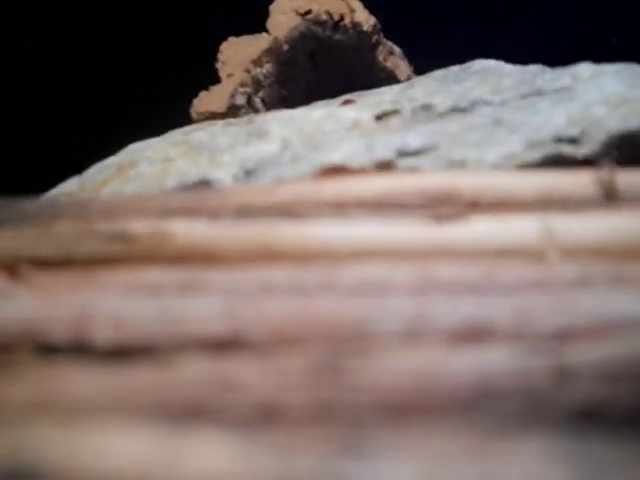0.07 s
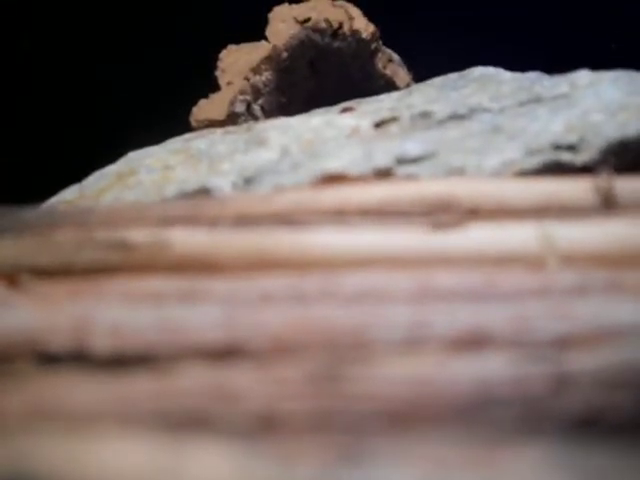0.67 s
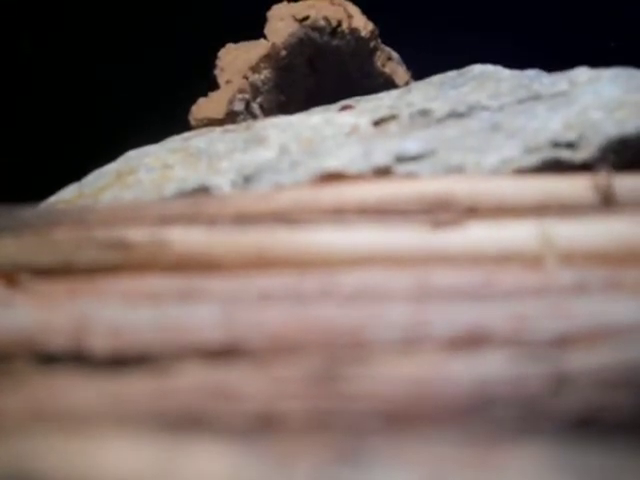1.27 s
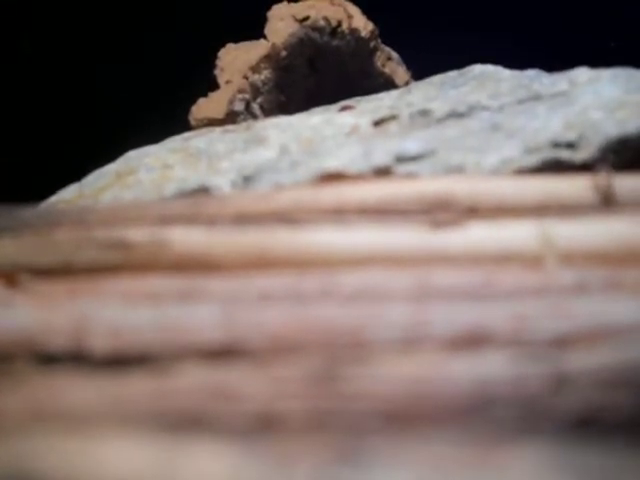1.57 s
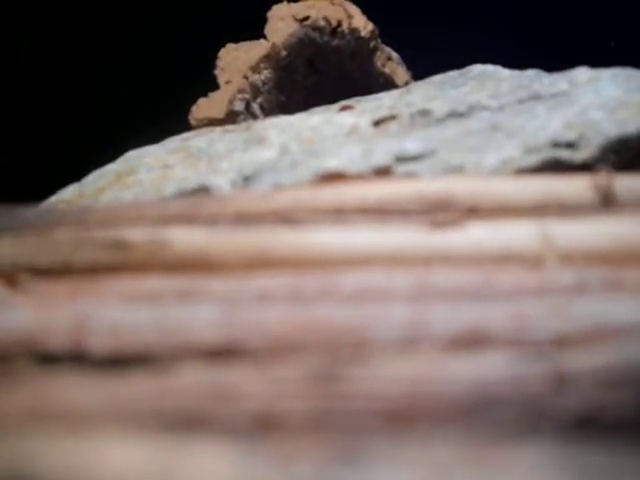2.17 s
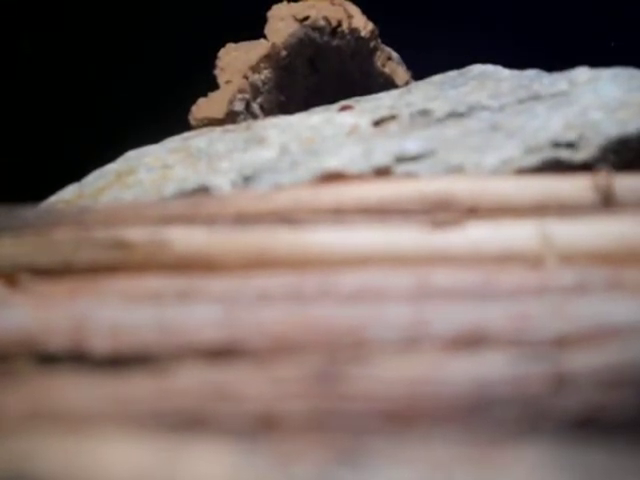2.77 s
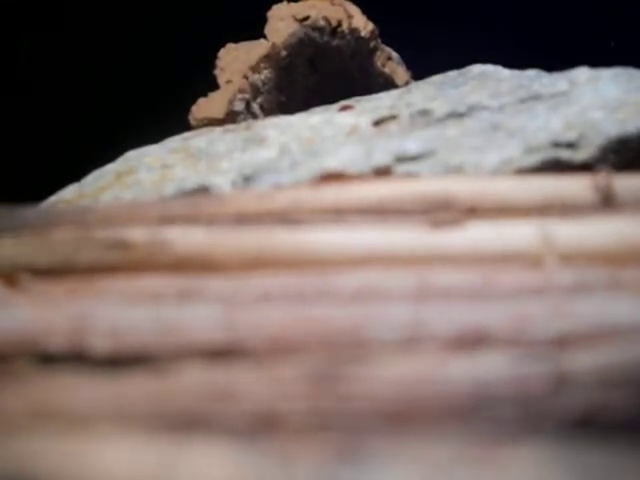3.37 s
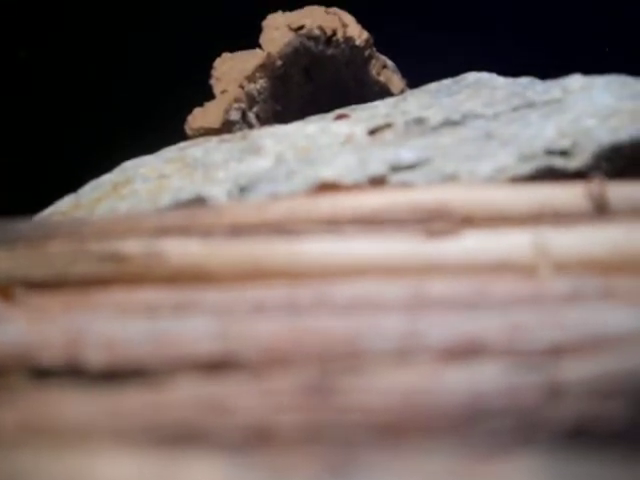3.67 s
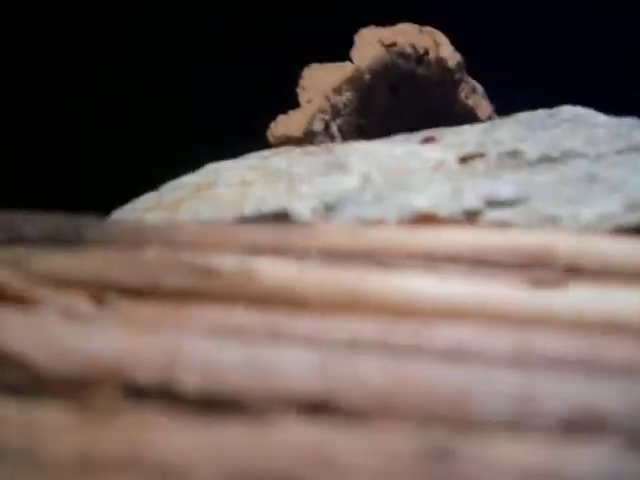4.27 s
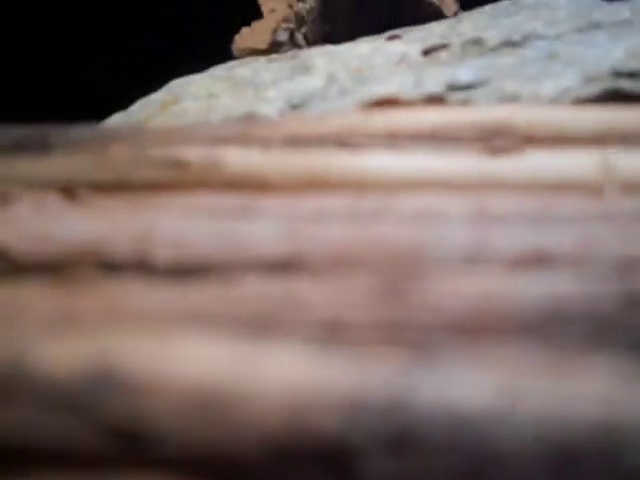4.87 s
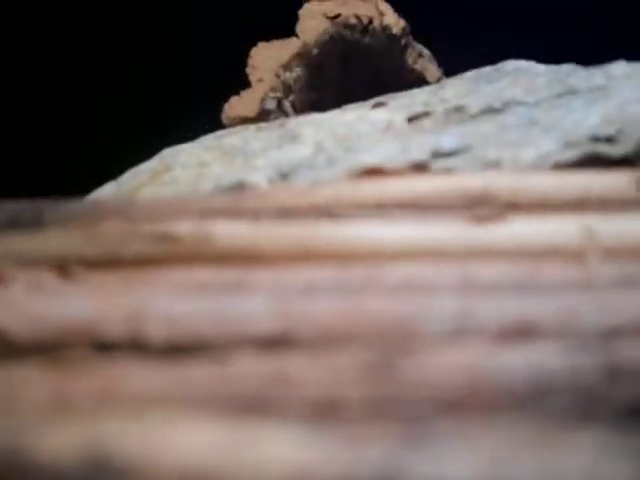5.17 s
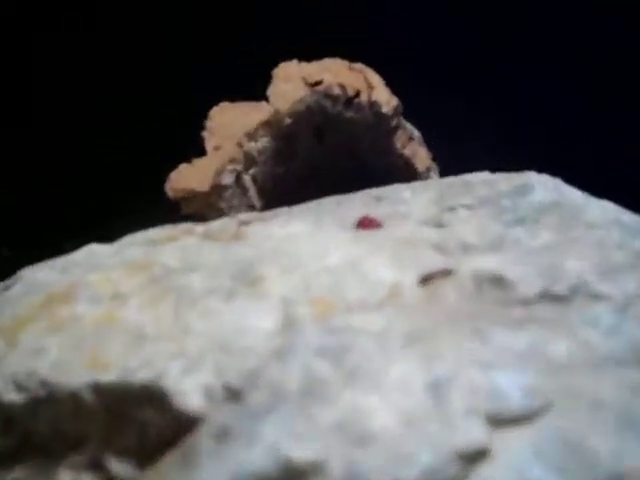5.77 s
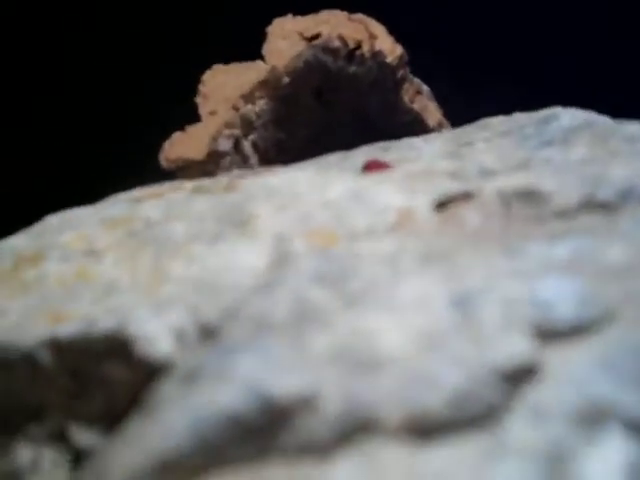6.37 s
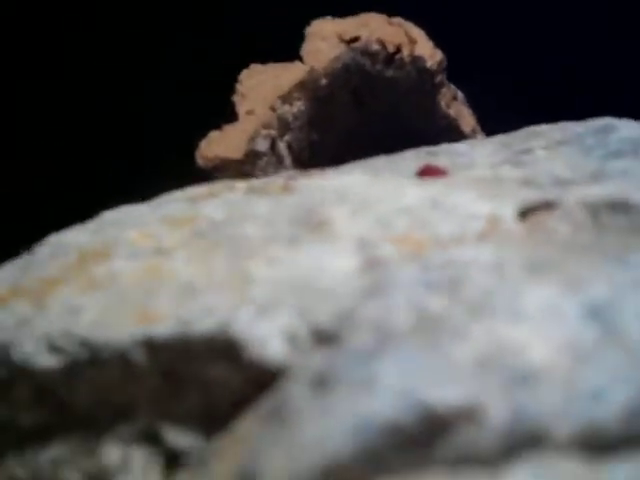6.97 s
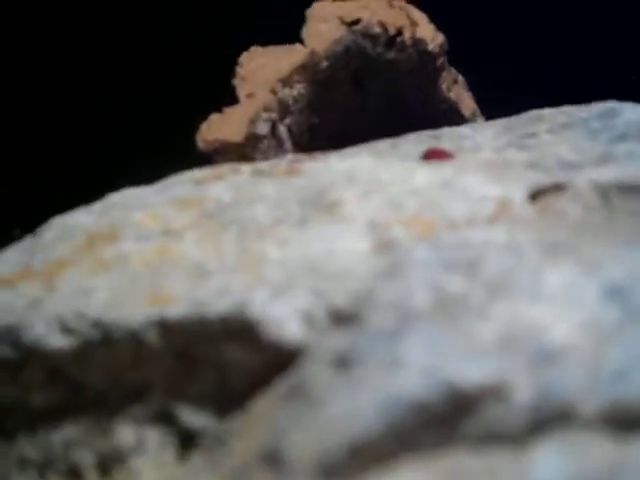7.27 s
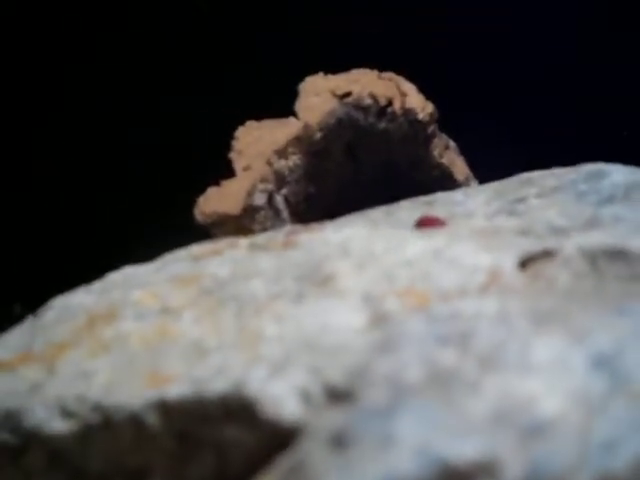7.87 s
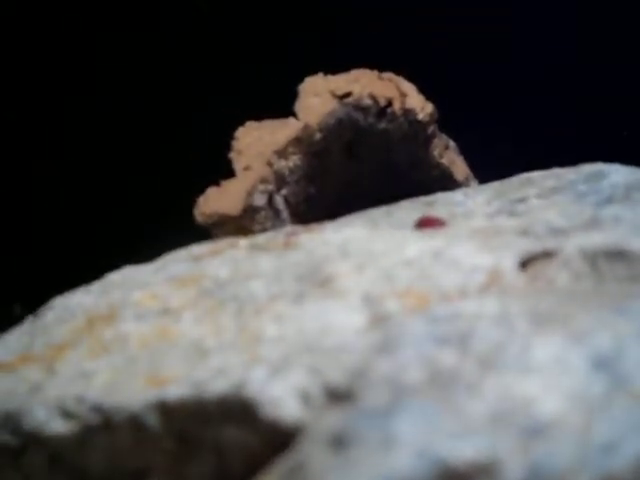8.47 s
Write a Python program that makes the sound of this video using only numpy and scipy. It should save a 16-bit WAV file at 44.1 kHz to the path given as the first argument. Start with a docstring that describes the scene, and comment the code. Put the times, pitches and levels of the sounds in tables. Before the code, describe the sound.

Handling noise comes straight through the case of a small camera indoors: scattered soft ticks, then a loud cluster of finger rubs, clicks and dull thuds. Lighter bumps lead to a second sharp knock with a rustle, and a plastic seam creaks briefly near the end. Behind it, an even hiss and faint fan hum dip after the heavier handling and slowly return. The sound is close, with little treble.

```python
"""Handling a small camera

A camera is held and shifted in a quiet room with a steady hiss and the hum of a fan. Fingers rub and
knock the case, which rings and carries it straight to the microphone; a seam creaks as the grip eases.
The room sinks after heavy handling and creeps back. The narrow recorder overloads on the hardest knocks."""
import sys
import numpy as np
from scipy import signal
from scipy.fft import rfft, irfft, next_fast_len
from scipy.io import wavfile
from scipy.ndimage import uniform_filter1d

SR = 44100
rng = np.random.default_rng(int(sys.argv[2]) if len(sys.argv) > 2 else 0)


def pcm_store(signal):
    """Save signal as 16-bit PCM."""
    levels = np.round(np.clip(np.atleast_2d(signal), -1, 1) * 32767)
    wavfile.write(sys.argv[1], SR, levels.astype(np.int16).T)


N = 380583
TIME = np.arange(N) / SR

# The three holds of the hand on the camera. Each entry: start in seconds.
HOLD_STARTS = [0, 6.5, 7.25]
# Tone of skin dragging on the case. Each row: frequency in Hz, relative level in dB.
FRICTION_SPECTRUM = [(20, -0.5), (60, 8), (130, -2.5), (300, 3.5), (600, 2), (1100, -2), (1800, -4.5),
                     (2500, -3.5), (3500, -9.5), (4400, -1), (5500, -56)]
# Tone of a dull blow through the whole body. Each row: frequency in Hz, relative level in dB.
THUD_SPECTRUM = [(20, -13), (70, 1), (150, -1.5), (300, -8.5), (600, -13), (1200, -22.5), (4000, -40)]


def amp(db):
    """Decibels to gain."""
    return 10 ** (np.asarray(db) / 20)


def unit(x):
    """Scales to an rms of 1."""
    return x / np.sqrt(np.mean(x ** 2) + 1e-20)


def add(mix, start, sound):
    """Mixes a sound in at a start time in seconds."""
    part = mix[round(start * SR):][:len(sound)]
    part += sound[:len(part)]


def colour(x, spectrum):
    """Equalises with a curve of (Hz, dB) points joined on a log axis."""
    hz, db = np.transpose(spectrum)
    size = next_fast_len(len(x))
    bins = np.fft.rfftfreq(size, 1 / SR)
    gain = amp(np.interp(np.log(bins + 1), np.log(hz), db))
    return irfft(rfft(x, size) * gain, size)[:len(x)]


def resonate(x, hz, width_hz):
    """Rings one resonance."""
    return signal.lfilter(*signal.iirpeak(hz, hz / width_hz, fs=SR), x)


def drift(rate):
    """A random wander of rms 1 that turns about rate times a second."""
    knots = np.arange(0, TIME[-1] + 1, 1 / rate)
    return unit(np.interp(TIME, knots, rng.standard_normal(len(knots))))


def hold_at(seconds):
    """Index of the hold in use at that moment."""
    return np.searchsorted(HOLD_STARTS, seconds, side="right") - 1


def room_tone(hiss_db=-41, waver=.003, flutter=.25):
    """A bed of even hiss under the slightly wavering tones of a fan."""
    # Colour of the hiss. Each row: frequency in Hz, relative level in dB.
    hiss_spectrum = [(15, -32), (25, -4), (42, -2), (90, -7.5), (140, -5), (175, -10), (215, -8.5),
                     (290, -15), (430, -14), (850, -16.5), (1250, -18), (3600, -22.5), (4500, -24),
                     (5500, -60.5)]
    # Hum of the fan. Each row: frequency in Hz, level in dB.
    fan_tones = [(37.7, -60.5), (145.3, -47), (209.9, -59), (479.1, -56), (1082, -60.5)]
    bed = amp(hiss_db) * unit(colour(rng.standard_normal(N), hiss_spectrum))
    for hz, db in fan_tones:
        level = amp(db) * (1 + flutter * drift(6.6))
        pitch = hz * (1 + waver * drift(6))
        bed += level * unit(np.sin(2 * np.pi * np.cumsum(pitch) / SR))
    return bed


def through_case(force, direct_db, hold):
    """The case passes a force on, partly direct and partly ringing in the modes this hold excites."""
    # Each row: frequency in Hz, width in Hz, then gain in dB in the first, second and third hold.
    modes = [(149, 40, 5, 5.5, -4), (294, 92, -2, 0, -32), (554, 130, -11.5, -2, -28),
             (820, 210, -6.5, -9, 4), (937, 66, -5.5, -0.5, -8), (1150, 440, 0.5, 4, -4),
             (1375.4, 150, -6.5, -3, -1), (1750, 190, -9.5, -14.5, 5.5), (2290, 560, -1, -0.5, -3),
             (2680, 440, -7, -7.5, 6.5), (2900, 240, -15, -4, 8.5), (3070, 410, -6, -10.5, -15),
             (3350, 340, -18.5, 6.5, -3), (3720, 120, -13.5, -12.5, 1)]
    rings = sum(amp(db[hold]) * resonate(force, hz, width) for hz, width, *db in modes)
    return amp(direct_db) * force + rings


def stroke_envelopes(rise_share=.56, shape=1.42, bass_lag_s=.0024):
    """Treble and bass gains: each finger stroke swells and fades, and the heavy body shakes on a little."""
    # Each row: time of the peak in seconds, length in seconds, level in dB, bass boost in dB.
    strokes = [ (0.255, 0.014, -32.5, -7), (0.342, 0.017, -37, 11.5), (1.097, 0.036, -42.5, 5),
               (3.696, 0.084, -33.5, 3.5), (3.905, 0.022, -27.5, 6.5), (3.999, 0.022, -27, 0.5),
               (4.046, 0.056, -19.5, 1.5), (4.165, 0.12, -29.5, 9), (4.216, 0.073, -35.5, 17.5),
               (4.329, 0.021, -30, 4), (4.365, 0.017, -37.5, 0), (4.469, 0.073, -27.5, 1),
               (4.535, 0.046, -17.5, 8.5), (4.663, 0.088, -41.5, 7), (4.722, 0.037, -38, 17),
               (4.856, 0.038, -50, 5), (5.054, 0.09, -45, -8.5), (5.183, 0.054, -45, -2.5),
               (5.361, 0.061, -36, 8.5), (6.057, 0.0074, -35, -8), (6.145, 0.066, -57, 7.5),
               (6.775, 0.059, -25, 0), (6.862, 0.062, -22, 0), (7.029, 0.13, -35.5, -2.5),
               (7.146, .028, -43, 1), (7.35, 0.053, -45, 11.5), (7.633, 0.14, -53.5, 14.5)]
    treble_power, bass_power = np.zeros((2, N))
    for peak, length, db, bass_db in strokes:
        rise, fall = rise_share * length, (1 - rise_share) * length
        near = abs(TIME - peak) < .5
        t = TIME[near] - peak
        power = amp(db) ** 2 * np.exp(-2 * np.maximum(-t / rise, t / fall) ** shape)
        treble_power[near] += power
        bass_power[near] += power * amp(bass_db) ** 2
    pole = np.exp(-1 / (bass_lag_s * SR))
    bass_power = signal.lfilter([1 - pole], [1, -pole], bass_power + 1e-20)
    return np.sqrt(treble_power), np.sqrt(bass_power)


def rubbing(slips_per_s=2500, catches_per_s=90, catch_db=-6, smooth=.7, judder_db=2.74, split_hz=600):
    """Skin sticks and slips over the case in many tiny steps, and now and then catches."""
    slips = rng.choice([-1, 1], N) * amp(np.minimum(rng.exponential(1, N), 4))  # sizes span 4 dB
    slips *= rng.random(N) < slips_per_s / SR
    catches = rng.choice([-1, 1], N) * (rng.random(N) < catches_per_s / SR)
    grain = unit(slips) + amp(catch_db) * unit(catches) + smooth * rng.standard_normal(N)
    force = colour(grain, FRICTION_SPECTRUM)
    per_hold = [unit(through_case(force, direct_db=-15, hold=k)) for k in range(len(HOLD_STARTS))]
    scrape = np.choose(hold_at(TIME), per_hold) * amp(judder_db * drift(150))
    bass = signal.sosfiltfilt(signal.butter(2, split_hz, fs=SR, output="sos"), scrape)
    treble_gain, bass_gain = stroke_envelopes()
    return treble_gain * (scrape - bass) + bass_gain * bass


def knocks(ring_cycles=13, click_hz=2600, click_t60=.00067, chatter_db=-9, chatter_t60=.027,
           thud_rise_s=.0022, thud_t60=.13, thud_db_per_octave=-5.5):
    """Each contact springs for a few cycles, clicks and chatters in the plastic, and thuds in the body."""
    # Each row: start in seconds, peak of the spring in dB, its pitch in Hz, peak of the click in dB.
    contacts = [ (0.339, -22.5, 800, -38), (0.3446, -26, 358, -17), (0.355, -32.5, 80, -35.5),
                (0.394, -26.5, 77.5, -45), (0.5517, -35, 1810, -26), (.862, -32, 850, -35),
                (1.101, -27.5, 1010, -36), (1.353, -32, 2000, -26), (3.48, -28.5, 866, -33.5),
                (3.628, -29, 950, -26), (3.69, -21.5, 804, -15.5), (3.897, -19.5, 46, -43),
                (3.991, -23, 710, -19), (4.0207, -9.5, 268, -18.5), (4.0244, -10.5, 850, -12),
                (4.096, -14.5, 520, -13.5), (4.184, -15, 713, -15.5), (4.3223, -27.5, 400, -24.5),
                (4.329, -19.5, 331, -18), (4.4736, -13, 1130, -21), (4.5074, -10, 2320, -17),
                (4.5394, -16.5, 137, -4.5), (4.5518, -10.5, 1090, -17), (4.5544, -3.5, 2740, -21),
                (4.5637, -8.5, 3460, -19.5), (4.6112, -22.5, 405, -22.5), (4.6238, -12.5, 754, -10.5),
                (4.735, -19.5, 670, -28.5), (5.3058, -19, 740, -23), (5.336, -24, 301, -20),
                (5.3905, -21, 590, -12.5), (5.4489, -19.5, 465, -24), (5.465, -40, 80, -45),
                (6.044, -26.5, 193, -36.5), (6.0577, -27.5, 870, -27), (6.064, -37, 168, -57.5),
                (6.1564, -30.5, 259, -33.5), (6.3198, -20, 893, -38), (6.853, -19.5, 69.5, -8),
                (6.8886, -3.5, 788, -10), (6.89, -6.5, 1320, -21), (6.896, -19.5, 418, -28),
                (6.966, -31, 1500, -18.5), (7.417, -40.5, 744, -39.5), (7.6552, -42, 756, -28)]
    # Weight of the thud in the first, second and third hold. Each entry: trim in dB.
    thud_trims = [-5, -11.5, -5]
    t = np.arange(SR // 3) / SR
    snap = np.sin(2 * np.pi * click_hz * t) * amp(-60 * t / click_t60)
    grit = unit(colour(rng.standard_normal(N), FRICTION_SPECTRUM))
    shudder = unit(colour(rng.standard_normal(N), THUD_SPECTRUM))
    chatter_shape = amp(chatter_db - 60 * t / chatter_t60)
    thud_shape = .5 * (1 - np.exp(-t / thud_rise_s)) * amp(-60 * t / thud_t60)
    out = np.zeros(N)
    for start, db, hz, click_db in contacts:
        hold = hold_at(start)
        span = slice(round(start * SR), round(start * SR) + len(t))
        bounce = np.sin(2 * np.pi * hz * t) * amp(-60 * t * hz / ring_cycles)
        spring = through_case(bounce, direct_db=0, hold=hold)
        click = through_case(snap + chatter_shape * grit[span], direct_db=-3.5, hold=hold)
        octaves_up = max(np.log2(hz / 500), 0)  # harder, higher contacts move the body less
        thud_db = db + thud_trims[hold] + thud_db_per_octave * octaves_up
        add(out, start, amp(db) * spring / abs(spring).max())
        add(out, start, amp(click_db) * click / abs(click).max())
        add(out, start, amp(thud_db) * thud_shape * shudder[span])
    return out


def afterring(handling, t60=.055):
    """The dull ring that the body and the room around it keep after each blow."""
    t = np.arange(SR // 2) / SR
    tail = colour(rng.standard_normal(len(t)), THUD_SPECTRUM) * amp(-60 * t / t60)
    tail /= abs(rfft(tail)).max()
    return 2 * amp(-17) * signal.fftconvolve(handling, tail)[:N]


def hollow_ring(handling, gain_db=-4.5):
    """The air inside the case rings briefly after every touch."""
    return amp(gain_db) * resonate(handling, hz=340, width_hz=7.4)


def firm_grip(rub, start_s=3.97, end_s=4.21, plain_db=-3):
    """Under the firmest grip the skin sings against the case in two narrow resonances."""
    # Each row: frequency in Hz, width in Hz, gain in dB.
    resonances = [(2310, 410, 4.5), (3080, 160, -9.5)]
    rings = sum(amp(db) * resonate(rub, hz, width) for hz, width, db in resonances)
    firmness = uniform_filter1d(1. * ((TIME > start_s) & (TIME < end_s)), size=800)
    return (1 - firmness) * rub + firmness * (amp(plain_db) * rub + rings)


def room_dips(sink_s=.063, return_s=.47):
    """A fader ride on the room tone: three times it sinks quickly and creeps back."""
    # Each row: start in seconds, end in seconds, depth in dB.
    dips = [(4.45, 5.36, -16), (5.347, 6.24, -23), (7.014, 7.92, -16)]
    curves_db = []
    for start, end, depth_db in dips:
        sinking = 1 - np.exp(-np.maximum(TIME - start, 0) / sink_s)
        release = np.exp(-np.maximum(TIME - end, 0) / return_s)
        curves_db.append(depth_db * sinking * release)
    return amp(np.min(curves_db, axis=0))


def creaks(snap_hz=1530, snap_t60=.00041, ring_hz=1430, ring_t60=.014, jitter=.043, spread_db=6):
    """As the grip eases, a plastic seam gives way in uneven runs of tiny slips that snap and ring on."""
    # Each row: start in seconds, length in seconds, typical peak in dB, slips per second.
    runs = [(7.465, .015, -26, 137), (7.484, .01, -24, 280), (7.565, .05, -36.5, 70)]
    t = np.arange(SR // 20) / SR
    snap = np.sin(2 * np.pi * snap_hz * t) * amp(-60 * t / snap_t60)
    ring = np.sin(2 * np.pi * ring_hz * t) * amp(-26 - 60 * t / ring_t60)
    out = np.zeros(N)
    for start, length, db, rate in runs:
        tick = through_case(snap + ring, direct_db=-23, hold=hold_at(start))
        tick /= abs(tick).max()
        slip_times = np.arange(start, start + length, 1 / rate)
        for when, (late, louder) in zip(slip_times, rng.standard_normal((16, 2))):
            add(out, when + jitter * late / rate, amp(db + spread_db * louder) * tick)
    return out


def scene():
    """Rubs, knocks and creaks up close over the room tone, in mono."""
    handling = firm_grip(rubbing()) + knocks() + creaks()
    room = room_tone() * room_dips()
    return (room + handling + afterring(handling) + hollow_ring(handling))[None]


def record(dry, ceiling=.71, edge_hz=16000):
    """The recorder keeps a narrow voice band, clips the tallest peaks and trims the top of the crackle."""
    # Each row: frequency in Hz, gain in dB.
    passband = [(0, 0), (3680, 0), (3820, -4), (4030, -16), (4230, -17), (4400, -25), (4550, -41),
                (4750, -62), (5070, -90)]
    size = next_fast_len(N + 4096)
    gain = amp(np.interp(np.fft.rfftfreq(size, 1 / SR), *np.transpose(passband)))
    narrow = irfft(rfft(dry, size) * gain, size)[:, :N]
    clipped = np.clip(narrow, -ceiling, ceiling)
    lowpass = signal.firwin(511, edge_hz, window=("kaiser", 9), fs=SR)
    return signal.oaconvolve(clipped, lowpass[None], "same")


dry = scene()
out = record(dry)
pcm_store(out)
```